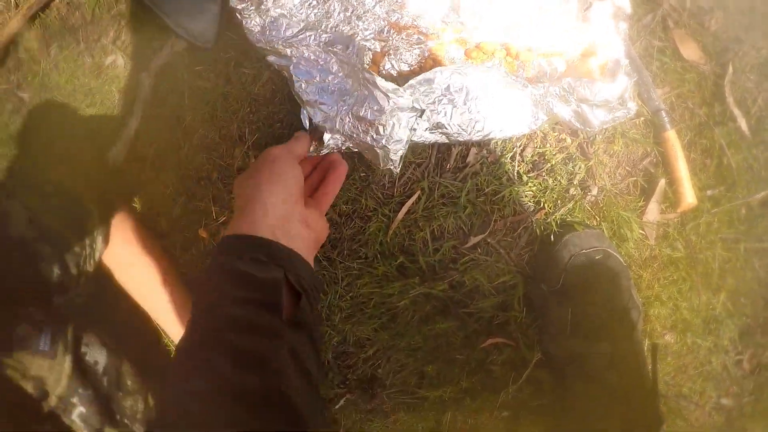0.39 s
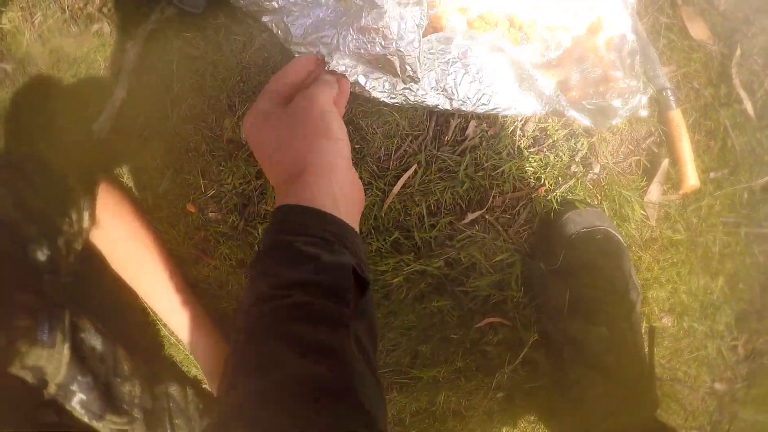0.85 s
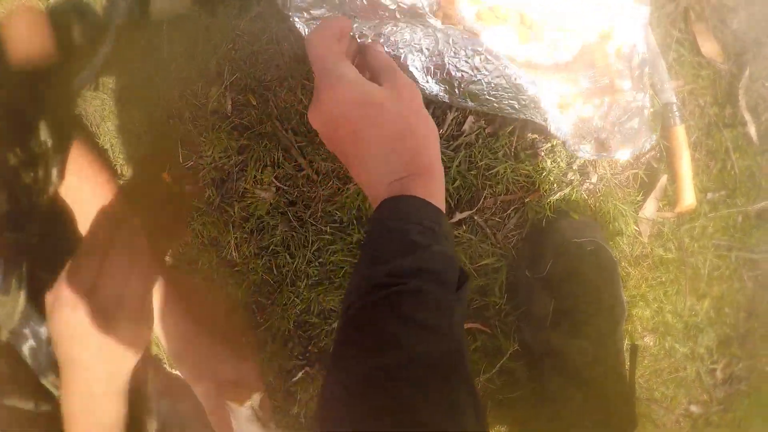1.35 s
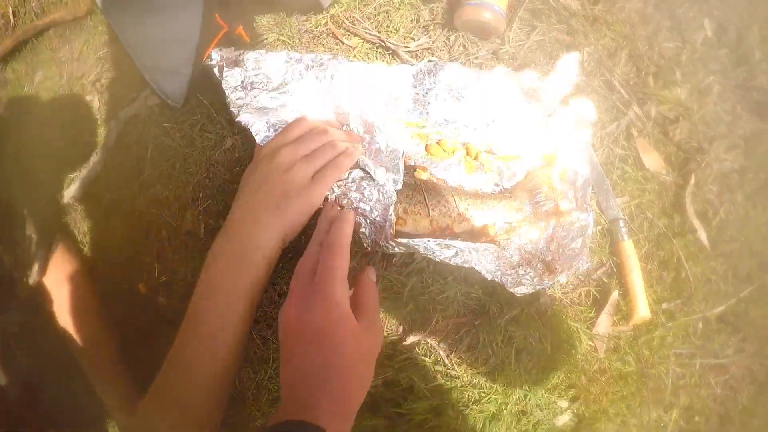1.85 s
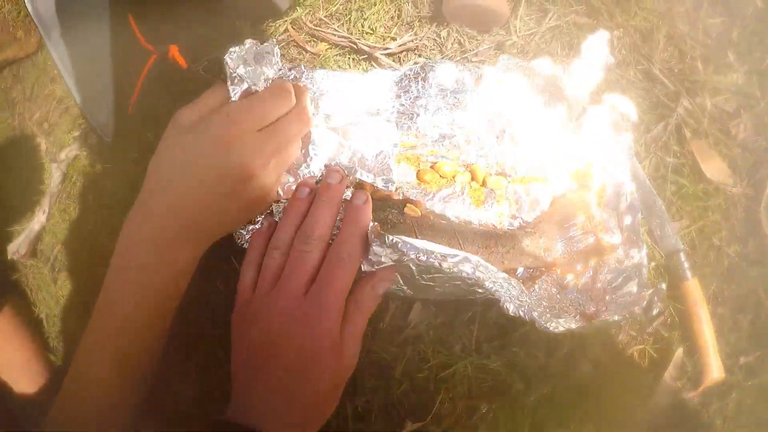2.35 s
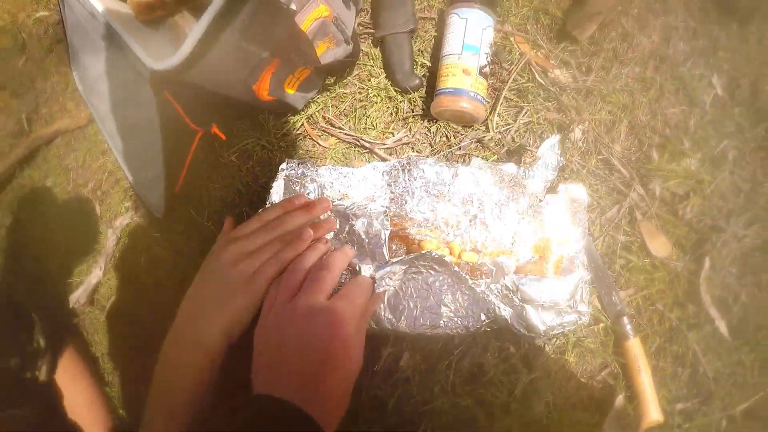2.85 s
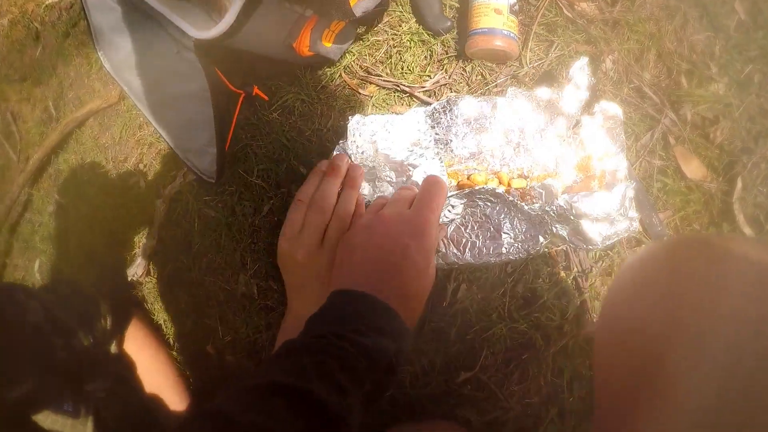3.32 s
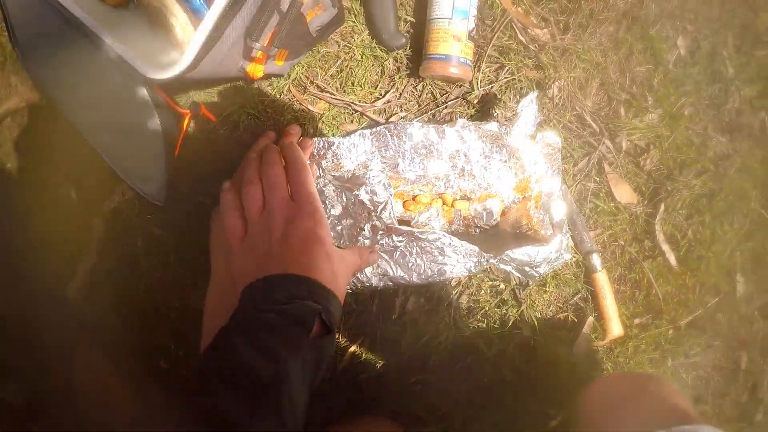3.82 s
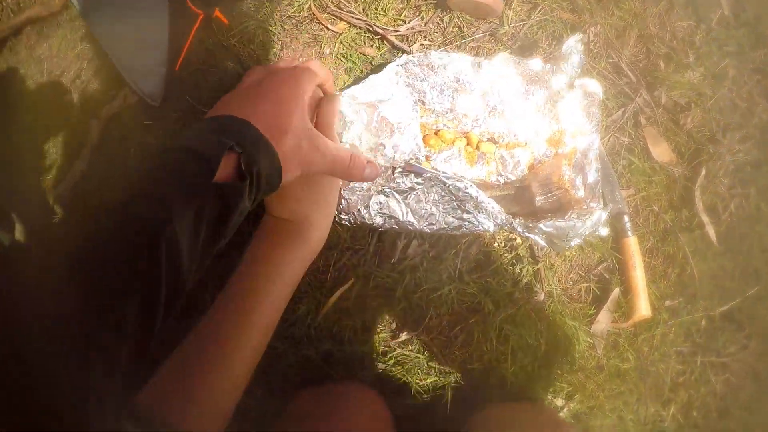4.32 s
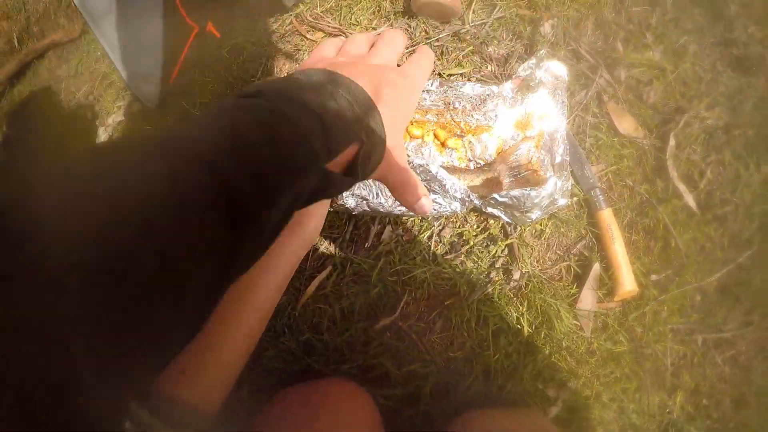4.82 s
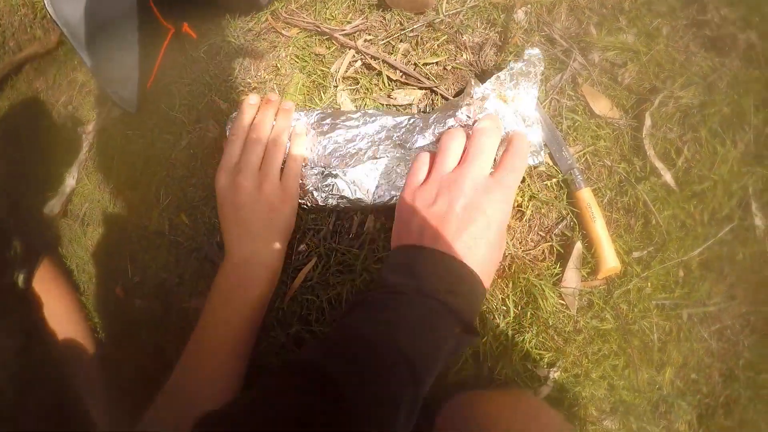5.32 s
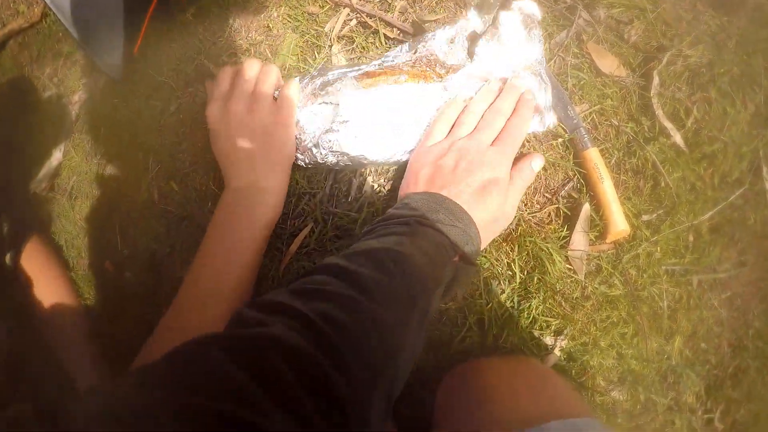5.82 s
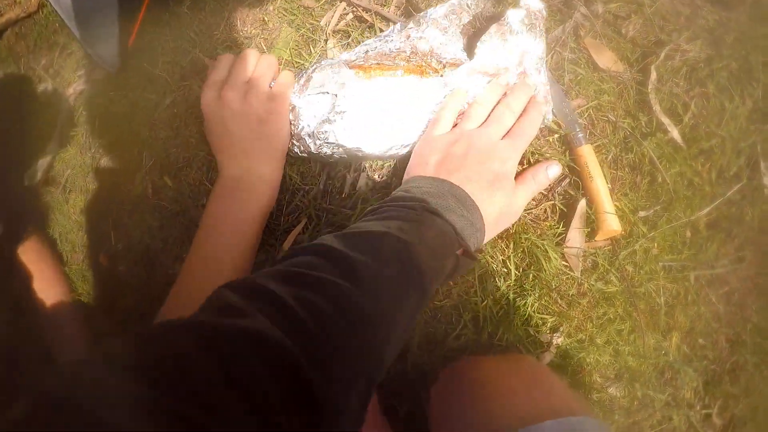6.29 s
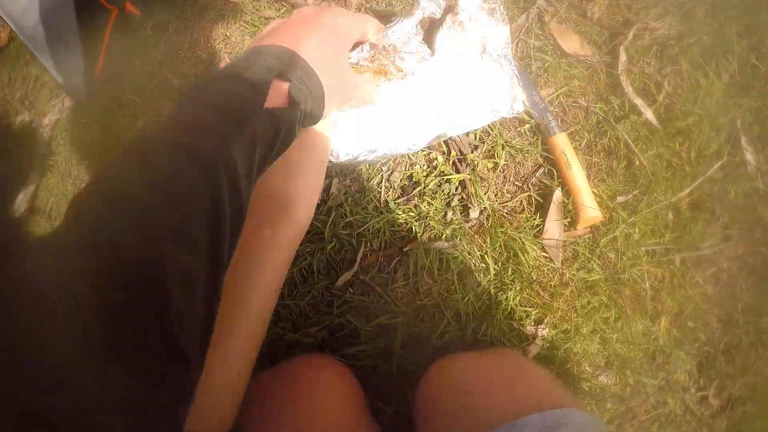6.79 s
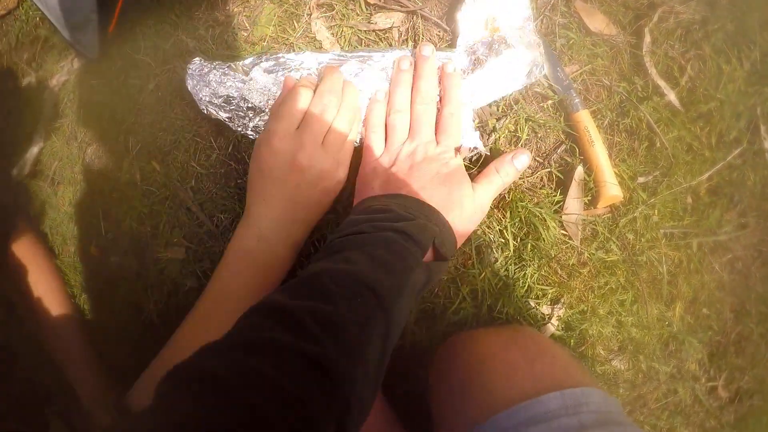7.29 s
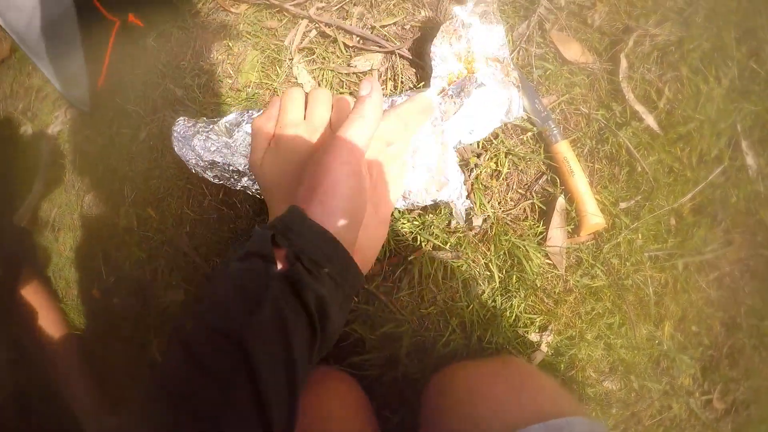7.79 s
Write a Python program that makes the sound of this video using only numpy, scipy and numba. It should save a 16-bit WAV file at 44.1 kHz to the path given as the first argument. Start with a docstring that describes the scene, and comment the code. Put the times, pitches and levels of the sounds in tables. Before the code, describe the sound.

Thin foil is folded and pressed by hand, faint at first, then close and bright with sharp crackles, over low wind buffeting and soft leaf hiss.

```python
"""Aluminium foil, folded and pressed round food by hand on the grass, under a head-worn two-port microphone.
Creases snap as short modes in dense swarms and lone cracks; noise makes the rustle, pitched facets ring on.
A breeze rumbles on the ports as filtered noise, and a fly hums as a wavering sine.
Filtered noise also gives a soft hiss of leaves and open air; damped low modes knock through the housing."""
import sys
import numpy as np
from scipy import signal
from scipy.fft import rfft, irfft, next_fast_len
from scipy.io import wavfile
from scipy.ndimage import uniform_filter1d
from numba import njit

SR = 44100
rng = np.random.default_rng(int(sys.argv[2]) if len(sys.argv) > 2 else 0)


def transcribe(signal):
    """Save signal, clipped to [-1, 1], as a 16-bit WAV file at the path in sys.argv[1]."""
    frames = np.atleast_2d(signal).T
    limited = np.clip(frames, -1, 1)
    pcm = np.round(limited * 32767).astype(np.int16)
    wavfile.write(sys.argv[1], SR, pcm)


def invert_db(x):
    """Field ratio 10**(x/20) for x, a level in decibels (scalar or array-like)."""
    u = np.asarray(x, float) / 20
    return 10 ** u


N = 348831
T = np.arange(N) / SR

# Foil levels below are relative: filters and a common gain follow.
# squeezes of the hands: start_s, length_s, start_level_db, end_level_db, large_over_small_facets_db
SQUEEZES = [(0, 0.032, -37.5, -54, 4), (0.167, 0.055, -49.5, -58, 8), (0.376, 0.05, -44, -36.5, 2),
            (0.482, 0.17, -37, -45.5, 3), (0.659, 0.071, -33.5, -34.5, 2), (0.769, 0.027, -40.5, -39.5, 8),
            (0.835, 0.24, -30.5, -35.5, 2.5), (1.168, 0.32, -30, -41, 1.5), (1.512, 0.016, -50, -32.5, 3),
            (1.579, 0.098, -30, -26.5, -1), (1.726, 0.21, -21.5, -33.5, 3), (1.981, 0.12, -26.5, -37, 4),
            (2.132, 0.14, -28.5, -24, 2.5), (2.302, 0.24, -25, -26, 2.5), (2.576, 0.055, -32.5, -29.5, -12),
            (2.656, 0.14, -29, -31, 3), (2.826, 0.051, -30, -29.5, 1.5), (2.921, 0.25, -22.5, -32.5, 4),
            (3.197, 0.19, -30.5, -26.5, 1.5), (3.437, 0.09, -33.5, -31, 5.5), (3.579, 0.047, -31.5, -26, 5),
            (3.66, 0.016, -46, -31.5, 15), (3.736, 0.04, -31, -31, 8.5), (3.8, 0.24, -35, -44, 6),
            (3.904, 0.38, -34, -27, 4), (4.321, 0.15, -34, -32.5, 4), (4.525, 0.07, -38, -43.5, 11.5),
            (4.62, 0.13, -30.5, -24, 2), (4.792, 0.13, -33.5, -30, 8), (4.967, 0.19, -35, -43, 6.5),
            (5.146, 0.086, -33, -24.5, 5), (5.3, 0.36, -24, -31.5, 4.5), (5.679, 0.18, -24, -27.5, 5),
            (5.905, 0.088, -34, -33, 2.5), (6.041, 0.082, -44.5, -36, 8.5), (6.17, 0.057, -30.5, -17.5, -2),
            (6.3, 0.082, -29, -41.5, 0), (6.424, 0.063, -30, -26, -8), (6.509, 0.087, -39, -37, 7.5),
            (6.727, 0.12, -40, -31, 9.5), (6.902, 0.32, -26, -33.5, 3), (7.098, 0.26, -23.5, -35.5, 2),
            (7.402, 0.15, -30, -32, 2), (7.61, 0.18, -32.5, -23.5, -1), (7.826, 0.11, -36.5, -35.5, 0)]
# loudest lone cracks: start_s, strength_db, large_over_small_facets_db, crease_run_ms
LOUD_CRACKS = [(0.663, -12.5, -7, 4), (0.6916, -22, 13, 2.7), (1.0807, -9.5, -25, 3.1),
               (1.117, -14.5, -13, 5.6), (1.127, -19, -6, 2.2), (1.3083, -10, 4, 3.4),
               (1.3814, -17, -23, 6.9), (1.4418, -14.5, -10, 3.5), (1.57, -7, -4, 3), (1.629, -4.5, 2, 5.3),
               (1.7411, -7.5, 6, 2), (1.7723, -5, -16, 0.61), (1.8599, -5, 5.0, 19),
               (1.9623, -17, 19, 1.12), (2.017, -10.5, -1, 1.6), (2.148, -1.5, 3.0, 11.4),
               (2.403, -6, -0.5, 2.3), (2.435, -21, -1.5, 1.7), (2.4836, -5.5, 0.5, 3.3),
               (2.4973, -2.5, 1.5, 4.65), (2.572, -7.5, 3.0, 4.9), (2.6016, -6, -19, 3.6),
               (2.667, -6, -4.5, 9.2), (2.8523, -7.5, 1, 3), (2.9295, -17, 4, 1), (3.213, -12, -9, 2.6),
               (3.2763, -5.5, -12.5, 1.07), (3.4558, -7.5, 6, 4.6), (3.5062, -8, 9, 2.2),
               (3.5914, -11, 1, 6.7), (3.6186, -6, 5.5, 2), (3.6925, -2, 7, 1.22), (3.762, -5, -4, 11),
               (3.8562, -10.5, -24, 3.3), (4.017, -8, 3, 1.44), (4.134, -12, -2, 3), (4.2969, -5.5, 2, 5.9),
               (4.4173, -5, 1, 8), (4.449, -9.5, -20, 2.2), (4.526, -15, -3, 9.5), (4.5757, -13.5, 3, 7.8),
               (4.6233, -10.5, 9, 3.3), (4.736, -14.5, 18, 6.9), (5.002, -15, 5, 7.1), (5.0198, -6, -4, 4),
               (5.074, -10, -12, 2.5), (5.1913, -3.5, -1, 1.7), (5.2255, -6.5, -14.5, 2.1),
               (5.252, -1.5, -14, 8.9), (5.3417, -14, 15, 2), (5.413, -7, -4, 8.8),
               (5.4484, -4.5, 6.5, 2.6), (5.6923, -18, 8, 4.3), (5.7303, -14, 11, 1.1),
               (5.7585, -4, 3.5, 3.2), (5.8258, -8, -7, 0.7), (5.8852, -2.5, -30, 1.27),
               (5.915, -9, -3, 0.98), (6.1303, -8, 2.5, 5.1), (6.2247, -7, 4, 0.68),
               (6.2441, -4, -15.5, 2.8), (6.3287, -8, 5, 1.38), (6.3552, -11, -21.5, 2),
               (6.3676, -6, 3, 1.57), (6.4212, -18.5, 16, 8.9), (6.4746, -14, -13, 0.58),
               (6.6095, -16.5, 21, 1.2), (6.688, -4.5, -12, 11), (6.8093, -9.5, 6.0, 2.1),
               (6.8476, -1, -4, 27), (6.9744, -3, -24, 2.4), (7.042, -8.5, -1, 2.5), (7.1124, -7, 2, 4.1),
               (7.3518, -10, 5.5, 1.2), (7.408, -14, -3, 10.5), (7.5467, -11, -10, 3.3),
               (7.646, -5, 5.5, 8.8), (7.6955, -5.5, 9.5, 1.03), (7.7058, -11, 11, 3.3)]
# pitched facets left ringing: start_s, level_db, pitch_hz, t60_ms
RINGING_FACETS = [(0.036, -48, 4650, 71), (.19, -54, 4700, 100), (0.369, -36, 5820, 47),
                  (.415, -43, 1260, 40), (.495, -39.5, 3450, 40), (.5, -40, 1270, 54),
                  (.662, -29, 7400, 30), (0.69, -21.5, 2300, 18), (1.635, -30.5, 4070, 70),
                  (1.707, -28, 1250, 24), (2.02, -31, 1820, 91), (5.255, -27, 4920, 32),
                  (5.311, -30, 3070, 79), (5.33, -20.5, 1205, 33), (5.378, -27, 2330, 44)]
# head turning to the foil: time_s, facing (0-1)
FACING = [(0, 0), (1.45, 0.18), (1.75, 0.61), (7.91, 1)]
# tone of foil straight into the ports: frequency_hz, relative_gain_db
FOIL_FRONT_TONE = [(260, -29), (450, -10.5), (802, -6.5), (944, -8), (1490, -6.5), (1680, -1.5),
                   (2700, -5.5), (4810, -4.5), (6100, 4.5), (9650, -11), (11400, -22.5), (13600, -24),
                   (14600, -33), (15500, -46)]
# tone of foil while the ports point past it: frequency_hz, relative_gain_db
FOIL_ASIDE_TONE = [(260, -59), (450, -7), (1200, -2.5), (1390, -8), (1950, -1), (2660, -5.5), (7280, -2),
                   (14000, -25), (15500, -33)]
# foil at the left port against the right: frequency_hz, left_over_right_db
LEFT_OVER_RIGHT = [(60, -2.0), (110, -1.5), (200, 12), (380, 22), (700, 5.0), (1290, 8.5), (2380, 1.5),
                   (4400, 0.5), (8120, 5.5), (15000, 14)]
# phase lead of the left port on foil: frequency_hz, lead_radians
LEFT_LEADS = [(700, -0.59), (1050, -2.02), (1400, -1.28), (1950, -2.15), (3200, 0.21), (4400, -0.66),
              (5800, 1.67), (7000, 1.8), (8200, 2.6), (10500, -1.3)]
# how alike the ports hear the foil: frequency_hz, likeness (0-1, limited to that range)
PORT_LIKENESS = [(400, 0), (1150, 1), (1600, 0.65), (2600, 0.43), (3300, 1), (4300, 0.96), (5000, 0.92),
                 (7000, 0.9), (8500, 0), (11500, 0.05)]
# breeze over time, before its common gain: time_s, relative_level_db
BREEZE_LEVEL = [(0.0, -38.5), (1.43, -30.5), (1.7, -23.5), (1.74, -31), (2.07, -27), (2.09, -23.5),
                (2.31, -29.5), (2.36, -26.5), (3.13, -29.5), (3.28, -24), (3.48, -29), (3.61, -18.5),
                (3.94, -25.5), (4.03, -34.5), (4.1, -26), (5.18, -30), (5.26, -23.5), (5.35, -28.5),
                (7.62, -34), (7.91, -32)]
# tone of the wind on the ports: frequency_hz, relative_gain_db
RUMBLE_TONE = [(8.8, -37), (15, 7), (27, -2), (46, -2), (500, -45.5), (650, -52), (1100, -120)]
# fly over time, before its waver: time_s, rms_level_db
FLY_LEVEL = [(0, -50.5), (1.4, -51.5), (1.7, -54), (5.4, -72), (5.7, -54), (6.8, -63), (7.0, -47.5),
             (7.91, -53)]
# tone of leaves and open air: frequency_hz, relative_gain_db
AIR_TONE = [(240, -35), (400, -1), (791, -6.5), (2060, -2), (3050, -28), (4530, -24), (6510, -23.5),
            (9520, -5.5), (15000, -47)]
# housing knocks, low mode before the low-pass: start_s, level_db, pitch_hz, left_over_right_db
JOLTS = [(1.57, -19, 94, 8), (1.749, -24.5, 286, 3), (1.869, -16.5, 237, 0), (1.899, -11.5, 124, 0),
         (2.093, -16.5, 126, 18), (2.25, -28, 202, 2), (2.356, -22, 264, 4), (2.418, -13.5, 107, 20),
         (3.62, -13, 82, 18), (3.638, -15, 102, 25), (3.716, -13, 117, 20), (4.55, -18, 105, 8),
         (5.27, -13, 80.7, 8), (5.539, -20, 127, 11), (5.938, -15.5, 119, 11), (6.458, -16.5, 104, 14),
         (6.603, -17, 79.4, 0), (6.608, -26, 382, -1), (7.35, -16, 79.5, 19), (7.677, -20.5, 217, 1)]

LARGE_HZ, SMALL_HZ = 1370, 4700  # facets are wholly large below the first, wholly small above the second
GRIP_DB_PER_S, LET_GO_DB_PER_S = 710, 365  # swell before a squeeze starts, decay after it ends
SETTLE_DB = -58  # faint ticking between squeezes, on the scale of the squeezes


def curve(table, t):
    """Reads the columns of a table at times t, joined by straight lines."""
    s, *columns = np.transpose(table)
    return [np.interp(t, s, c) for c in columns]


def on_log(table, hz):
    """Reads a table of values by frequency on a log axis."""
    f, v = np.transpose(table)
    return np.interp(np.log(hz + 1), np.log(f + 1), v)


def colour(x, table):
    """Minimum-phase filter shaped by a gain table; white noise keeps its power."""
    size = 8192
    cep = irfft(np.log(invert_db(on_log(table, np.fft.rfftfreq(size, 1 / SR)))))
    # fold the cepstrum forward in time so the filter is causal
    cep[1:size // 2] *= 2
    cep[size // 2 + 1:] = 0
    taps = irfft(np.exp(rfft(cep)))[:size // 2]
    taps = taps / np.sqrt(np.sum(taps ** 2))
    return signal.oaconvolve(np.atleast_2d(x), taps[None], axes=1)[:, :N]


def walk(rate):
    """Random levels held 1 / rate seconds and smoothed twice; spread near 1."""
    hold = int(SR / rate)
    steps = np.repeat(rng.standard_normal(N // hold + 1), hold)
    return 1.42 * uniform_filter1d(uniform_filter1d(steps, hold), hold)[:N]


@njit
def ring(start, hz, t60, size, turn, length):
    """Damped modes that build up over half a cycle; three paths carry each with its own phase."""
    out = np.zeros((3, length))
    for g in range(len(start)):
        step = np.exp((2j * np.pi * hz[g] - np.log(1000) / t60[g]) / SR)
        z = size[g] + 0j
        # each mode stops once it has fallen 40 dB
        for i in range(start[g], min(length, start[g] + int(t60[g] * SR * 2 / 3))):
            rise = min(1., (i - start[g]) * 2 * hz[g] / SR)
            for k in range(3):
                out[k, i] += rise * (z * turn[g, k]).imag
            z *= step
    return out


def large(hz):
    """How far a mode belongs to the large, low-pitched facets, 0-1."""
    return np.clip(np.log(SMALL_HZ / hz) / np.log(SMALL_HZ / LARGE_HZ), 0, 1)


def sizes(count, spread_db, most_db):
    """Many small, few large, capped by what thin foil can store; mean power 0 dB."""
    db = np.minimum(spread_db * rng.exponential(size=count), most_db)
    return db - 10 * np.log10(np.mean(invert_db(2 * db)))


def avalanches(rate, t60):
    """Activity that jumps when a fold gives way and then dies down; mean power 1."""
    kicks = (rng.random(N) < rate / SR) * rng.exponential(size=N)
    power = 0.25 + signal.lfilter([1], [1, -1000 ** (-2 / (t60 * SR))], kicks)
    return power / power.mean()


def crumpling():
    """Foil level and facet balance in dB: each squeeze swells, holds its slope and dies away."""
    power, facets = invert_db(2 * SETTLE_DB), 0
    for s, length, start_db, end_db, facet_db in SQUEEZES:
        db = np.interp(T, [s, s + length], [start_db, end_db])
        db = db - GRIP_DB_PER_S * np.maximum(s - T, 0)
        db = db - LET_GO_DB_PER_S * np.maximum(T - s - length, 0)
        power = power + invert_db(2 * db)
        facets = facets + invert_db(2 * db) * facet_db
    return 10 * np.log10(power), facets / power


def snaps(s, db, facet_db, t60, run, dull_db, count):
    """Each crease that buckles rings count short modes scattered over the sheet's range."""
    chance = rng.random((len(s), count, 5))
    hz = 300 + 15000 * (np.arange(count) % 12 + chance[..., 0]) / min(count, 12)
    # parts of a crease let go one after another along the fold, the last ones weaker
    late = chance[..., 1] ** 1.4
    mode_db = db[:, None] + facet_db[:, None] * large(hz) - 4.66 * late
    mode_db = mode_db - dull_db * hz / 10000  # dull_db is the loss at 10 kHz
    size = invert_db(mode_db) / np.sqrt(count)
    start = (s[:, None] + run[:, None] * late) * SR
    turn = np.exp(2j * np.pi * chance[..., 2:]).reshape(-1, 3)
    return ring(start.astype(int).ravel(), hz.ravel(), np.repeat(t60, count), size.ravel(), turn, N)


def pings(s, db, hz, t60):
    """A flat facet keeps ringing on its own pitch after the crease beside it lets go."""
    turn = np.exp(2j * np.pi * rng.random((len(s), 3)))
    return ring((s * SR).astype(int), hz, t60, invert_db(db), turn, N)


def swarm(work, count, ring_ms, ping_ms, ping_db):
    """Dense small snaps in avalanches, with pitched facets among them."""
    s = rng.random(count) * N / SR
    at = (s * SR).astype(int)
    db, facet_db = (v[at] for v in work)
    db = db + 10 * np.log10(avalanches(70., 0.15)[at])
    t60 = ring_ms / 1000 * invert_db(3 * rng.standard_normal(count))
    tick_db = db + sizes(count, 0.91, 7.0)
    ticks = snaps(s, tick_db, facet_db, t60, t60 / 5, dull_db=-2.0, count=5)
    hz = 600 * invert_db(26 * rng.random(count))  # even on a log axis
    # low facets are large and ring longer
    t60 = ping_ms / 1000 * (3000 / hz) ** 0.23 * invert_db(2.1 * rng.standard_normal(count))
    facet_ping_db = db + ping_db + sizes(count, 3.8, 9.9) + (facet_db - 11.5) * large(hz)
    return ticks + pings(s, facet_ping_db, hz, t60)


def cracks(work, count):
    """The loudest cracks, and lesser ones at even random times, stronger where the squeeze is stronger."""
    chance = rng.standard_normal((count, 2))
    at = rng.integers(0, N, count)
    lesser_db = work[0][at] + 14 + sizes(count, spread_db=3, most_db=7)
    lesser_facet_db = work[1][at] - 9 + 8 * chance[:, 0]
    lesser_run_ms = 0.5 * invert_db(8.2 * chance[:, 1])
    lesser = (at / SR, lesser_db, lesser_facet_db, lesser_run_ms)
    s, db, facet_db, run_ms = np.hstack([np.transpose(LOUD_CRACKS), lesser])
    t60, run = np.full(len(s), .003), np.clip(run_ms, .1, 60) / 1000  # seconds
    return snaps(s, db, facet_db, t60, run, dull_db=3.5, count=48)


def rustle(work):
    """Countless creases too small to tell apart blend into noise that follows the squeezes."""
    return invert_db(work[0] - 10.5) * rng.standard_normal((3, N))


def at_ports(paths):
    """Each port hears a shared path and one of its own, set apart in level and phase by frequency."""
    size = next_fast_len(N)
    shared, left, right = rfft(paths, size)
    hz = np.fft.rfftfreq(size, 1 / SR)
    alike = np.clip(on_log(PORT_LIKENESS, hz), 0, 1)
    ports = np.sqrt(alike) * shared + np.sqrt(1 - alike) * np.array([left, right])
    # half the difference goes to each port
    lean = invert_db(on_log(LEFT_OVER_RIGHT, hz) / 2) * np.exp(.5j * on_log(LEFT_LEADS, hz))
    return irfft(ports * np.array([lean, 1 / lean]), size)[:, :N]


def foil():
    """Swarm, cracks, rustle and ringing facets of buckling foil, toned by where the head faces."""
    work = crumpling()
    paths = invert_db(-1.0) * swarm(work, count=14000, ring_ms=3.5, ping_ms=46.3, ping_db=-12.0)
    paths = paths + cracks(work, count=360) + rustle(work)
    # the ports' treble resonance speaks most to sound from the front
    facing = np.clip(curve(FACING, T)[0], 0, 1)
    front = colour(facing * paths, FOIL_FRONT_TONE)
    aside = invert_db(-1.5) * colour((1 - facing) * paths, FOIL_ASIDE_TONE)
    s, db, hz, t60_ms = np.transpose(RINGING_FACETS)
    return invert_db(7.0) * at_ports(front + aside + pings(s, db, hz, t60_ms / 1000))


def breeze():
    """Eddies roll over each port mostly on its own; flutter over 100 Hz grows far less than the rumble."""
    db = curve(BREEZE_LEVEL, T)[0]
    # lift against the rumble: 1 dB at -26.5 dB on the breeze table, 0.74 dB less per dB of breeze
    flutter_db = 1 - 0.74 * (db + 26.5) + 2.5 * walk(10)
    eddies = colour(rng.standard_normal((2, N)), RUMBLE_TONE)
    high_pass = signal.butter(2, 100., "high", fs=SR, output="sos")
    fast = signal.sosfilt(high_pass, eddies)
    fast = 0.24 * fast + 0.78 * fast[::-1]  # the flutter is partly shared
    # the wind swings between the ports and favours the right one
    lean_db = -1.1 + 1.0 * walk(3)
    level = invert_db(db + 7.5 + np.array([lean_db, -lean_db]))
    return level * (eddies + (invert_db(flutter_db) - 1) * fast)


def fly():
    """A faint wing tone, a sine wavering in pitch and level, the same at both ports."""
    hz = 227.7 * (1 + 0.01037 * walk(12))
    phase = 2 * np.pi * np.cumsum(hz) / SR
    return np.sqrt(2) * invert_db(curve(FLY_LEVEL, T)[0] + 1.25 * walk(8.8)) * np.sin(phase)


def air():
    """Soft hiss of leaves and open air: slowly swelling noise, separate at each port."""
    level_db = -55.5 + 2 * walk(3)
    return invert_db(level_db) * colour(rng.standard_normal((2, N)), AIR_TONE)


def jolts():
    """Dull knocks carried through the housing: a low mode and a weaker, higher, shorter one."""
    s, db, hz, pan_db = np.transpose(JOLTS)
    start, t60 = (s * SR).astype(int), np.full(len(s), 0.062)  # t60 in seconds
    turn = np.ones((len(s), 3), complex)
    ports = []
    for side in (1, -1):  # left, right
        size = invert_db(db + side * pan_db / 2)
        low = ring(start, hz, t60, size, turn, N)[0]
        high = ring(start, 2.66 * hz, t60 / 2, size, turn, N)[0]
        ports.append(low + 0.41 * high)
    return signal.sosfilt(signal.butter(2, 500., fs=SR, output="sos"), ports)


def scene():
    """All sources summed at the two ports."""
    return foil() + breeze() + fly() + air() + jolts()


def top_cut(x):
    """Nothing passes above the cut-off."""
    return signal.sosfilt(signal.butter(12, 15750, fs=SR, output="sos"), x)


def record(dry):
    """The camera's input stage saturates softly and rounds the loudest peaks."""
    round_at = 1.03  # amplitude the peaks level off at
    rounded = round_at * np.tanh(dry / round_at)
    return top_cut(rounded)


dry = scene()
out = record(dry)
transcribe(out)
```